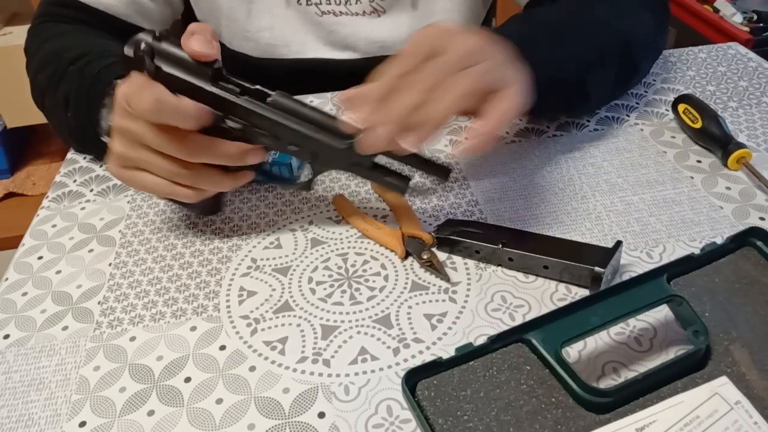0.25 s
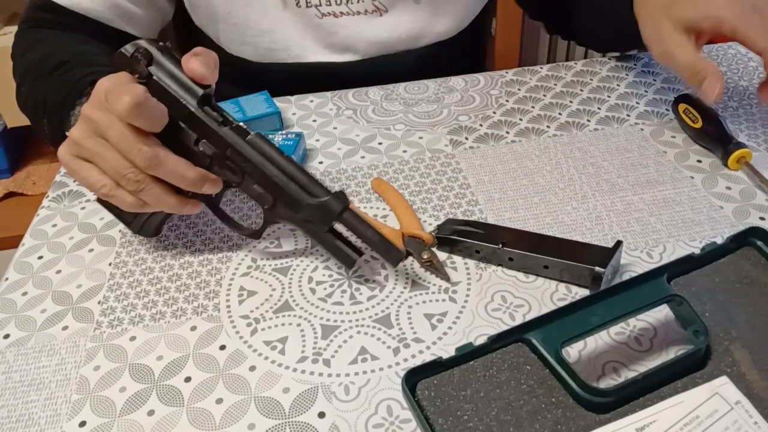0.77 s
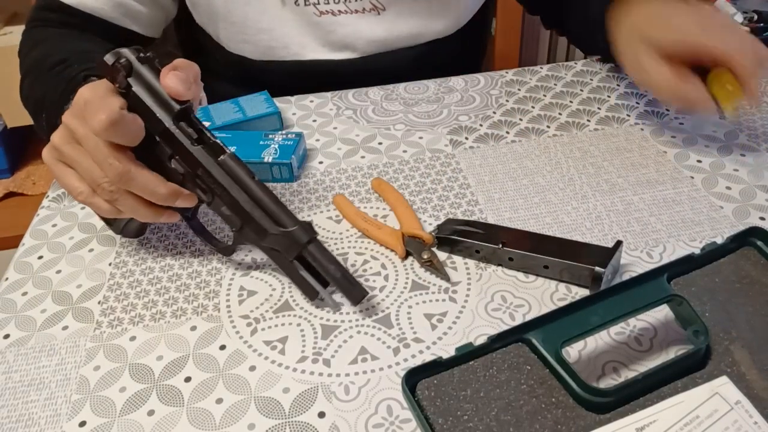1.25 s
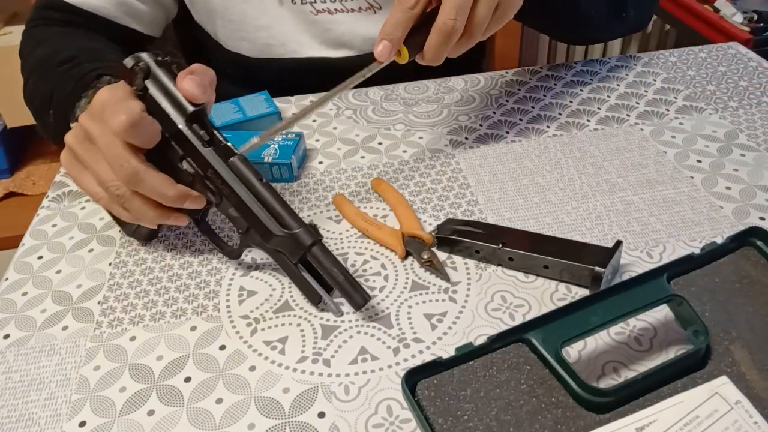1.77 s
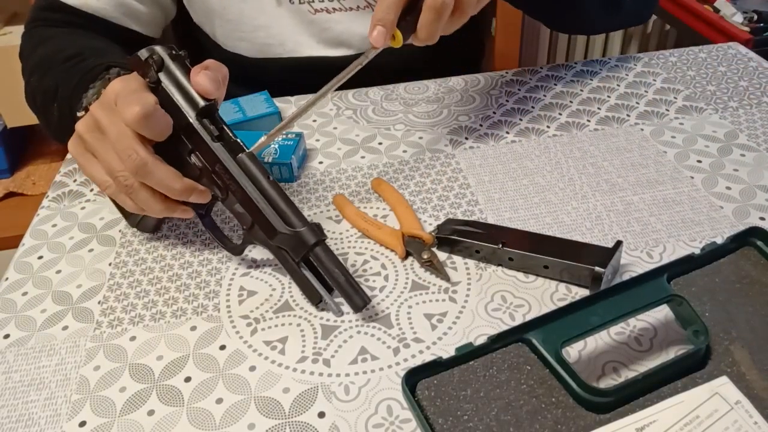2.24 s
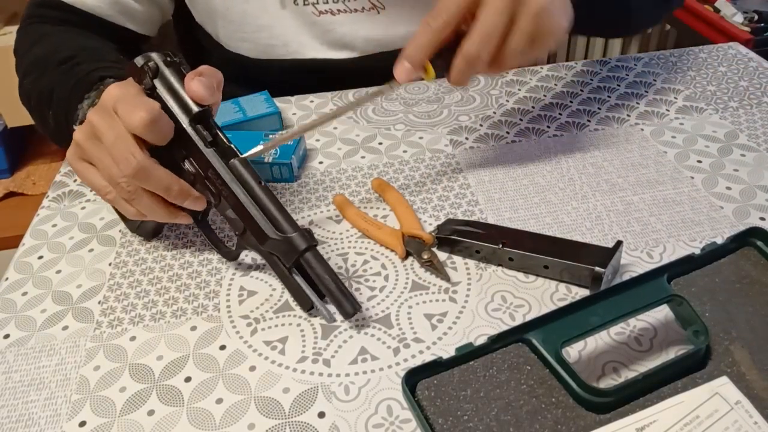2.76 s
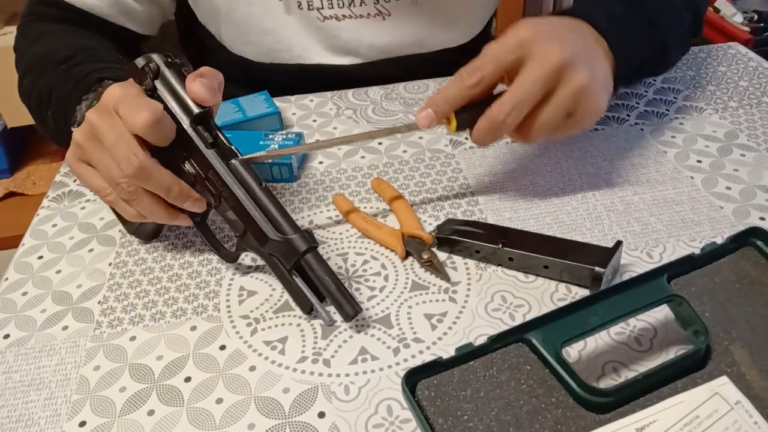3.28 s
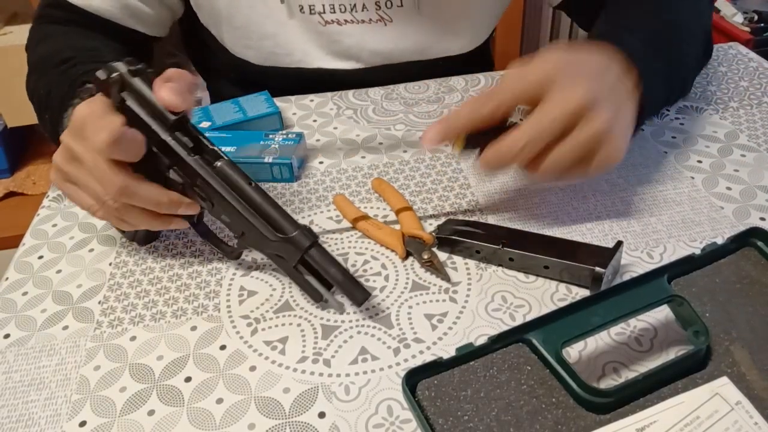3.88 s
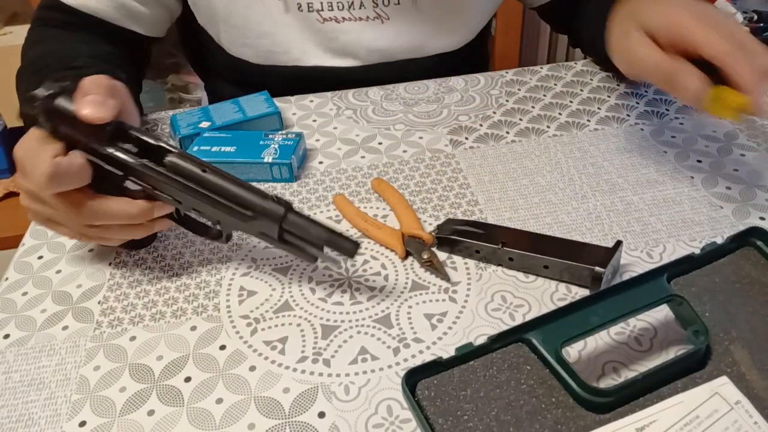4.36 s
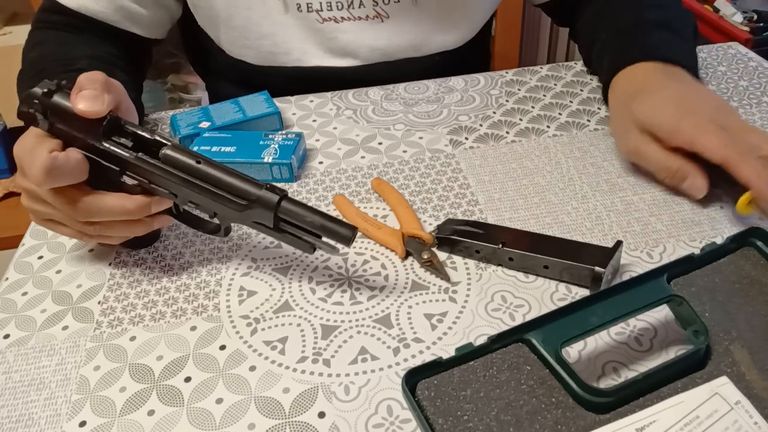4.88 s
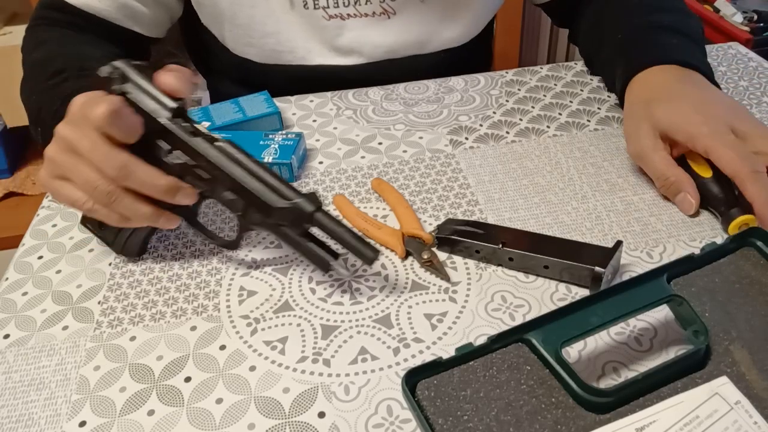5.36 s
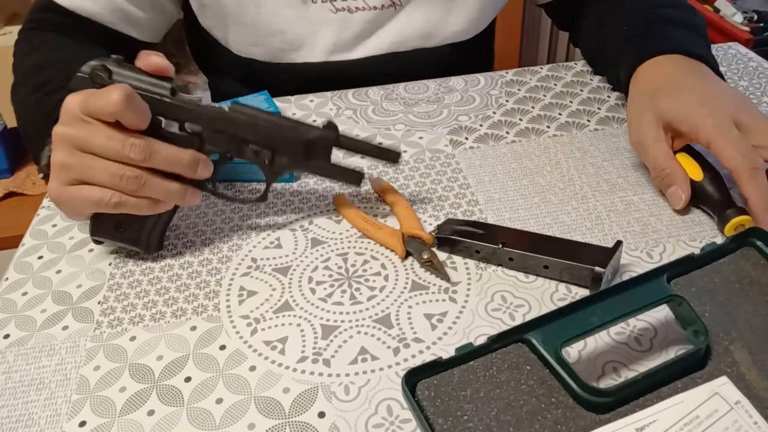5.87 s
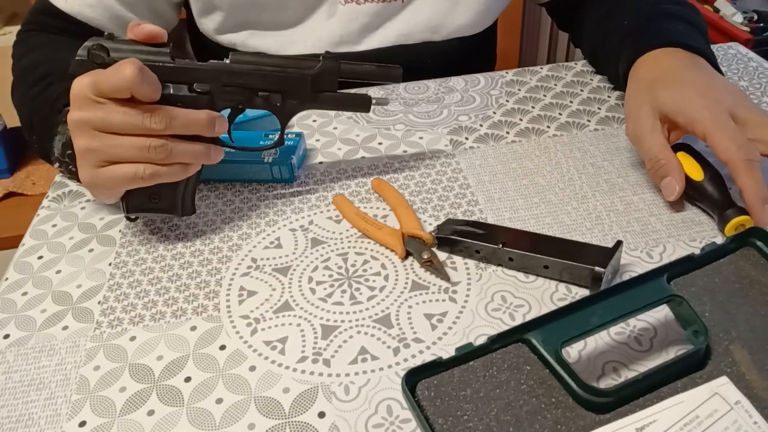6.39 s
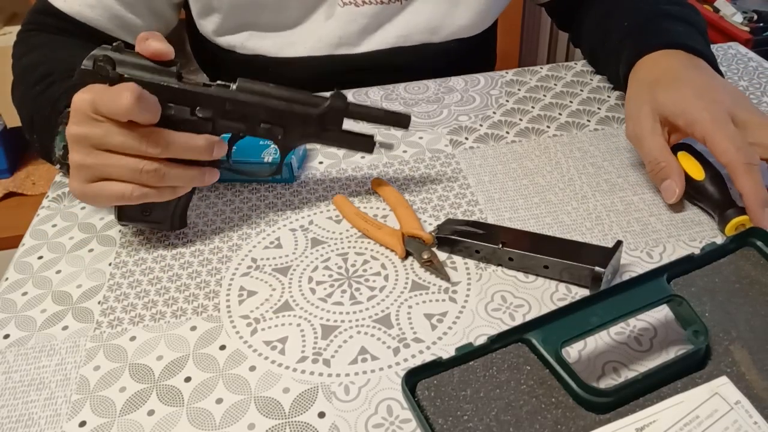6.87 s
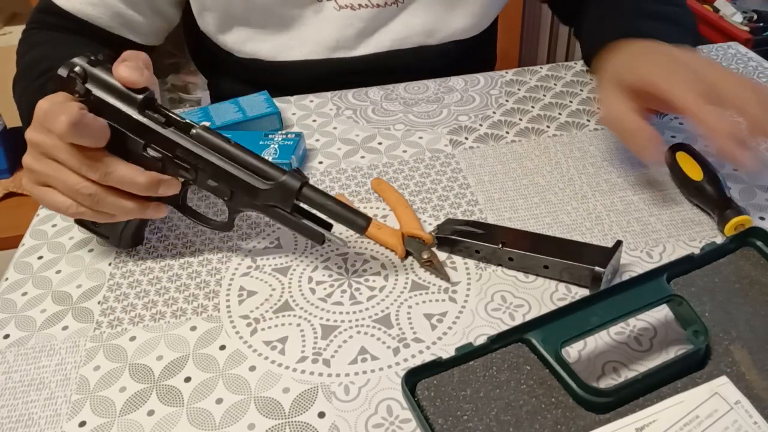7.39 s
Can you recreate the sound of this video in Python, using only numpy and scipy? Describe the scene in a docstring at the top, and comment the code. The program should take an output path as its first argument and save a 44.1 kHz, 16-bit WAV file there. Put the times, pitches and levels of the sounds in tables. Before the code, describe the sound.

A pistol is handled close to a stereo microphone pair in a small, bare room with a short echo. Quiet room tone, low finger rustle and a faint, wavering hum lie underneath. A light click opens, and at 1.2 seconds a soft table knock comes with a sleeve brushing cloth. Around 1.9 seconds a small steel lever clicks several times and a screwdriver blade taps brightly. A dull bump on the grip follows at 2.9, and a cluster of clicks and bumps near 4 seconds. At 5 seconds a catch snaps, and at once the slide strikes with a hard, briefly rattling metal clack, the loudest sound. The grip knocks firmly on the cloth-covered table at 5.3. Another sharp click comes at 6 seconds and two short, high squeaks at about 6.4. Faint metal ticks and soft handling bumps continue until about 7.6 seconds.

```python
"""A small, bare room, a spaced microphone pair close to a cloth-covered table where a pistol is worked.
A lever clicks, a screwdriver blade taps, a catch lets go, the slide clacks and the grip knocks on the
table: each blow is a brief chatter of contacts that rings one part, and the walls answer.
Fingers shift, sleeves brush the cloth and something squeaks twice near the end.
Behind it all lie the room tone and a faint, wavering drone."""
import sys
import numpy as np
from scipy import signal
from scipy.fft import rfft, irfft, next_fast_len
from scipy.io import wavfile
from scipy.ndimage import uniform_filter1d

SR = 44100
rng = np.random.default_rng(int(sys.argv[2]) if len(sys.argv) > 2 else 0)


def pcm_store(signal):
    """Save signal as 16-bit PCM."""
    levels = np.round(np.clip(np.atleast_2d(signal), -1, 1) * 32767)
    wavfile.write(sys.argv[1], SR, levels.astype(np.int16).T)


N = 336483

# Blows on metal and table. Each row: start in seconds, level in dB, brightness in dB per octave,
# chatter time in seconds, left over right in dB, room send in dB.
LEVER_CLICKS = [(0.0, -55.5, 12.5, 0.0022, 1, 3), (1.8711, -43.5, 7, 0.0012, 0.5, -6),
                (1.8924, -52.5, 7.5, 0.0017, 8, -1), (1.9043, -48.5, 2.5, 0.0023, -4, -8),
                (3.958, -48.5, 1, 0.0012, 0, -5.5), (6.0179, -42.5, 4, 0.00067, -2.5, -3.5)]
TABLE_KNOCKS = [(1.1925, -47, -3, 0.0067, 0.2, -1.5), (1.9105, -53.5, 4.5, 0.00088, 0.32, -2.5),
                (3.950, -51.5, 2.5, 0.0041, 0.61, -0.5), (5.2655, -24.5, 1.5, 0.0018, 1.9, -2),
                (6.265, -57.5, -2, 0.019, 1.5, -2), (6.44, -61, -9, 0.0044, 0.46, 1.5),
                (7.16, -62.5, 2.6, 0.03, 1, -1.5)]
BLADE_TAPS = [(1.963, -44, 1, 0.0013, 2.3, -4.5), (2.1782, -58, -2.7, 0.00082, 3, -7),
              (3.9824, -52, 0.87, 0.00059, 1.9, -10)]
CATCH_SNAPS = [(4.9935, -34.5, 0.97, 0.00065, 7, -5), (6.0182, -47.5, 0, 0.00057, 3, -8.5)]
SLIDE_CLACKS = [(5.1012, -18.5, 1, 0.0024, 3, -6.5), (5.1208, -30.5, 0.5, 0.0047, 0.78, -1),
                (5.1585, -31, -3.5, 0.0054, 1.1, -14), (5.181, -33.5, -4, 0.0034, 1, 0),
                (5.198, -41.5, -4.5, 0.0055, 0.85, -4)]
# Hand against grip. Each row: as above, without left over right.
GRIP_BUMPS = [(.95, -65, 2, 0.014, 1), (1.7, -68, 5, 0.017, 2), (1.87, -61, -6, 0.0047, -3),
              (1.971, -52.5, -7.5, 0.0026, -9.5), (2.892, -45.5, -4.5, 0.0057, -1.5),
              (3.339, -64, 0, 0.009, -5), (3.79, -65, 1, .012, 2.5), (3.961, -50, 0.5, 0.011, -6.5),
              (4.55, -55, -1.5, 0.0074, -8.5), (4.78, -66, 6.5, 0.013, 5), (5.79, -59, 7.5, 0.011, 0.5),
              (6.02, -57.5, 8.5, 0.0058, 3.5), (6.25, -61.5, 4, 0.012, -9), (7.56, -61.5, 2, 0.019, 2)]
# Tiny ticks of metal on metal. Each row: start in seconds, level in dB.
FINE_TICKS = [(2.6026, -81), (2.651, -73.5), (2.7203, -84), (2.973, -79), (3.8416, -63.5), (5.4553, -74)]

# What each part rings with, damped by the hand. Each row: frequency in Hz, width in Hz, level in dB.
LEVER_MODES = [(336, 71, 0), (720, 510, 4), (1980, 1300, -2.5), (2700, 580, -2.5), (3290, 510, -9),
               (3970, 910, -9), (4970, 1300, -17.5), (6220, 3150, -23)]
GRIP_MODES = [(82, 130, -10.5), (167, 140, 0.5), (234, 32, -11.5), (330, 110, -8), (560, 250, -22)]
TABLE_MODES = [(135, 330, -10), (259, 76, -6), (436.7, 26, 0), (492, 320, -1), (853, 190, -3),
               (1205, 410, -9.5), (1486, 130, -16), (2206, 640, -28), (6200, 1100, -61.5)]
BLADE_MODES = [(1950, 320, -1), (2630, 950, -3.5), (3690, 560, -3), (4590, 330, 1), (5350, 840, -7.5),
               (6470, 460, 1.5), (8300, 980, -15), (11100, 1300, -22.5), (14500, 1700, -23)]
TICK_MODES = [(3570, 580, -20.5), (6200, 420, -4), (6800, 1100, 2), (8300, 1300, -10.5)]
CATCH_MODES = [(198, 200, -1.5), (540, 160, -4.5), (945, 260, 1), (1490, 150, 0.5), (1980, 570, -7),
               (3100, 900, -15.5), (5283, 1500, -34), (6400, 650, -33)]
SLIDE_MODES = [(173, 110, -13), (290, 180, -10.5), (785, 200, -5), (1003, 390, -7.5), (1717, 290, -1),
               (1844, 16, 5), (2030, 250, -5.5), (1985, 31, -1), (2470, 130, -4), (2725, 500, -7.5),
               (3530, 680, -16.5), (4540, 450, -28.5), (5527, 550, -25), (6470, 1700, -29)]

# Sleeves and screwdriver sliding on the tablecloth.
# Each row: start in seconds, length in seconds, level in dB, brightness in dB per octave.
CLOTH_STROKES = [(0.389, 0.5, -78, 4.5), (1.175, 0.2, -63.5, 0.5), (1.28, 0.42, -72.5, -5),
                 (3.551, 0.13, -73.5, -0.5), (4.059, 0.28, -80.5, -2.5), (4.228, 0.34, -78, 5),
                 (5.298, 0.51, -81.5, 2.5), (7.46, 0.39, -77.5, 0.5)]
# Pitched sounds: a low hum, a thin whine above it, two squeaks.
# Each row: start in seconds, length in seconds, pitch in Hz, relative level in dB.
HUM_SWELLS = [(.45, 0.26, 108, -73.5), (1.95, 0.51, 132, -70.5), (2.5, 1.6, 89, -69.5),
              (6.48, 0.71, 133.6, -64.5), (7.14, 0.19, 112, -64.5), (7.44, 0.27, 140, -64)]
WHINE_SWELLS = [(6.5, .18, 596, -75), (6.8, 0.29, 630, -75)]
SQUEAKS = [(6.383, 0.062, 3160, -59), (6.444, .042, 2900, -49.5)]
# The harmonics of a squeak. Each row: multiple of the pitch, relative level in dB.
SQUEAK_HARMONICS = [(1, 5), (2, -7.5), (3, -16)]

# Colour of the noises and of the microphones. Each row: frequency in Hz, relative level in dB.
ROOM_TONE_SPECTRUM = [(15, -45), (25, -22.5), (92, -4), (159, -8.5), (228, -10.5), (343, -14.5),
                      (378, -13.5), (555, -17), (672, -14), (796, -20), (1980, -20), (3450, -31.5),
                      (5710, -47.5), (6750, -38.5), (7800, -47), (10100, -86), (17200, -120)]
SKIN_SPECTRUM = [(30, -18), (90, 2), (200, 0.5), (380, -4.5), (750, -6.5), (1500, -21), (6000, -62)]
CLOTH_SPECTRUM = [(200, -7.5), (700, -0.5), (2200, 9), (3500, -2.5), (5000, -4.5), (6800, -1), (9000, -13),
                  (15000, -25)]
MIC_RESPONSE = [(20, -2.5), (7200, 1.5), (7900, -10.5), (9500, -14), (15000, -19)]
# How alike the two microphones hear. Each row: frequency in Hz, left-right correlation.
MIC_CORRELATION = [(50, 0.93), (130, 0.81), (300, 0.83), (500, 0.32), (850, 0.095), (1500, -.2),
                   (4000, -0.069), (9000, 0.44)]
# First echoes off the walls. Each row: delay in seconds, level in dB.
WALL_ECHOES = [(.011, -17.5), (0.0229, -15)]
# The room's decay. Each row: frequency in Hz, time to fall 60 dB in seconds.
ROOM_T60 = [(150, 0.51), (400, 0.28), (1000, 0.39), (2700, 0.36), (7000, 0.3), (14000, .25)]


def amp(db):
    """Decibels to gain."""
    return 10 ** (np.asarray(db) / 20)


def unit(x):
    """Scales to rms 1."""
    return x / np.sqrt(np.mean(x ** 2) + 1e-30)


def pan(db):
    """Stereo gains that put the left microphone db above the right."""
    return amp([[db / 2], [-db / 2]])


def curve(points, hz):
    """Joins (Hz, value) points on a log-frequency axis."""
    point_hz, value = np.transpose(points)
    return np.interp(np.log(hz + 1), np.log(point_hz + 1), value)


def add(mix, start, sound):
    """Mixes a sound in at start seconds."""
    part = mix[:, max(round(start * SR), 0):][:, :sound.shape[1]]
    part += sound[:, :part.shape[1]]


def colour(x, points):
    """Filters by a (Hz, dB) spectrum."""
    hz = np.fft.rfftfreq(x.shape[-1], 1 / SR)
    return irfft(rfft(x) * amp(curve(points, hz)), x.shape[-1])


def swell(length, rise_s, fall_s):
    """Attack, hold and release."""
    t = np.arange(0, length, 1 / SR)
    return np.clip(np.minimum(t / rise_s, (length - t) / fall_s), 0, 1)


def wobble(size, span):
    """Random unevenness of rms 1, smoothed over span samples."""
    return unit(uniform_filter1d(rng.standard_normal(size), size=span))


def noise_pair(size):
    """White noise at two spaced microphones: alike in the bass, much less so higher up."""
    left, other = rfft(rng.standard_normal((2, size)))
    alike = np.clip(curve(MIC_CORRELATION, np.fft.rfftfreq(size, 1 / SR)), -.99, .99)
    right = alike * left + np.sqrt(1 - alike ** 2) * other
    return irfft(np.array([left, right]), size)


def causal(gain):
    """Gives a magnitude the phase of a real resonator, which rings only after the blow."""
    log_gain = np.log(gain + 1e-7)
    mirrored = np.concatenate([log_gain, log_gain[..., -2:0:-1]], -1)
    return np.exp(np.conj(signal.hilbert(mirrored)))[..., :gain.shape[-1]]


def room(x, gap_s=0.0046, build_s=0.0014):
    """Two wall echoes in a diffuse tail that swells after a short gap; each band dies at its own speed."""
    hz, t, bands = signal.stft(noise_pair(SR * 3 // 4), SR, nperseg=256)
    decay = amp(-60 * t / curve(ROOM_T60, hz)[:, None])
    tail = signal.istft(bands * decay, SR, nperseg=256)[1]
    since_gap = np.maximum(np.arange(tail.shape[1]) / SR - gap_s, 0)
    tail *= 1 - np.exp(-since_gap / build_s)
    tail /= np.linalg.norm(tail[0])
    for delay, db in WALL_ECHOES:
        tail[:, round(delay * SR)] += amp(db)
    return signal.fftconvolve(np.atleast_2d(x), tail, axes=1)


def blows(rows, modes, crack_db, size=8192):
    """Each blow is a brief chatter of contacts that rings the modes of one part, and then the room."""
    out, t, hz = np.zeros((2, N)), np.arange(size) / SR, np.fft.rfftfreq(size, 1 / SR)
    peaks = [amp(db) / (1 + ((hz - centre) / (width / 2)) ** 2) for centre, width, db in modes]
    body = np.linalg.norm(peaks, axis=0)
    body *= hz ** 2 / (hz ** 2 + 70 ** 2)  # small parts radiate little bass
    hardest_db = max(row[1] for row in rows)
    for start, db, tilt_db, chatter_s, pan_db, room_db in rows:
        ring = unit(body * amp(tilt_db * np.log2((hz + 100) / 1000)))
        force = amp(db) * np.sqrt(SR / 100)  # the energy of 10 ms at this level
        age = t / chatter_s
        contact = rfft(noise_pair(size) * np.sqrt(age) * np.exp(-age))
        contour = np.sqrt(uniform_filter1d(abs(contact) ** 2, size=31, axis=1))
        contact *= force / causal(contour)  # all modes get an equal push
        crack = amp(crack_db + db - hardest_db)  # the contact itself cracks, more so in a hard blow
        direct = irfft(contact * causal(np.hypot(ring, crack)))
        reverb = room(irfft(contact[0] * causal(ring)))
        add(out, start, direct * pan(pan_db))
        add(out, start, amp(room_db) * reverb * pan(1))
    return out


def room_tone(db=-70.5):
    """The room's own steady noise."""
    return amp(db) * unit(colour(noise_pair(N), ROOM_TONE_SPECTRUM))


def lever_clicks():
    """A small steel lever clicks, ringing in broad, damped modes."""
    return blows(LEVER_CLICKS, LEVER_MODES, crack_db=-23)


def fingers(db=-70.5, lumps_db=4.0, start_s=0.14, rise_s=0.27):
    """Low, lumpy rustle of fingers that start shifting on the grip and keep on."""
    lumps = unit(uniform_filter1d(wobble(N, 2000), size=500))
    fade_in = np.clip((np.arange(N) / SR - start_s) / rise_s, 0, 1)
    rustle = colour(noise_pair(N), SKIN_SPECTRUM) * amp(lumps_db * np.tanh(lumps))
    return amp(db) * fade_in * unit(rustle)


def sleeves(rest_db=-88, grain_db=1):
    """Cloth sliding on cloth: each stroke is a soft hiss, uneven as the fibres catch."""
    out = amp(rest_db) * unit(colour(noise_pair(N), CLOTH_SPECTRUM))
    for start, length, db, tilt_db in CLOTH_STROKES:
        speed = swell(length, rise_s=0.054, fall_s=0.17)
        spectrum = [(hz, level + tilt_db * np.log2(hz)) for hz, level in CLOTH_SPECTRUM]
        hiss = unit(colour(noise_pair(2 * SR), spectrum))
        add(out, start, amp(db) * speed * hiss[:, :len(speed)])
    return out * amp(grain_db * wobble(N, 200))


def drone(swells, width_hz):
    """A narrow, wavering tone comes and goes in the background, each swell on its own pitch."""
    out, size = np.zeros((1, N)), next_fast_len(N)
    band = np.exp(-(np.fft.fftfreq(size, 1 / SR) / width_hz) ** 2)
    waver = np.fft.ifft((rng.standard_normal(size) + 1j * rng.standard_normal(size)) * band)
    waver /= np.sqrt(abs(waver))  # softens the swings in level
    for start, length, hz, db in swells:
        envelope = swell(length, rise_s=0.066, fall_s=0.13)
        samples = round(start * SR) + np.arange(len(envelope))
        tone = (waver[samples % size] * np.exp(2j * np.pi * hz * samples / SR)).real
        add(out, start, amp(db) * envelope[None] * unit(tone))
    return out


def grip_bumps(pan_db=2):
    """The hand bumps the grip, which rings low and soft, a little to the left."""
    rows = [(*bump, pan_db, room_db) for *bump, room_db in GRIP_BUMPS]
    return blows(rows, GRIP_MODES, crack_db=-39)


def table_knocks():
    """The grip knocks on the table, dull through the cloth."""
    return blows(TABLE_KNOCKS, TABLE_MODES, crack_db=-51)


def blade_taps():
    """The screwdriver blade meets the pistol with a sharp crack and a bright ring."""
    return blows(BLADE_TAPS, BLADE_MODES, crack_db=-8)


def metal_ticks(turn_start_s=5.5, turn_end_s=7.3, count=10, loose_db=-78.5, spread_db=4.5):
    """Metal ticks on metal here and there, and loose parts tick faintly while the pistol is turned."""
    gap = (turn_end_s - turn_start_s) / count
    loose = [(turn_start_s + (k + late) * gap, loose_db + spread_db * (2 * force - 1))
             for k, (late, force) in enumerate(rng.random((count, 2)))]
    tilt_db, chatter_s, pan_db, room_db = 0, 0.0011, 0.7, -12
    rows = [(start, db, tilt_db, chatter_s, pan_db, room_db) for start, db in FINE_TICKS + loose]
    return blows(rows, TICK_MODES, crack_db=-10)


def catch_snaps():
    """The catch lets go: a very short contact rings it in the midrange."""
    return blows(CATCH_SNAPS, CATCH_MODES, crack_db=-37)


def slide_clacks():
    """The steel slide strikes once, hard, and four lighter clacks follow at once."""
    return blows(SLIDE_CLACKS, SLIDE_MODES, crack_db=-34.5)


def squeaks(scoop=0.037, scoop_s=0.0045, sag_per_s=0.15, jitter=0.022, fade_db_per_s=373, edge_s=0.0019):
    """Two short, nearly pure squeaks: each scoops up to its pitch, then sags and fades."""
    out = np.zeros((2, N))
    for start, length, hz, db in SQUEAKS:
        t = np.arange(0, length, 1 / SR)
        pitch = hz * (1 - scoop * np.exp(-t / scoop_s) - sag_per_s * t)
        pitch *= 1 + jitter * wobble(len(t), 90)
        phase = 2 * np.pi * np.cumsum(pitch) / SR
        tone = unit(sum(amp(part_db) * np.sin(k * phase) for k, part_db in SQUEAK_HARMONICS))
        flutter_db = wobble(len(t), 250)  # the rubbing is uneven
        tone *= amp(db - fade_db_per_s * t + flutter_db) * swell(length, edge_s, edge_s)
        add(out, start, tone * pan(3))
        add(out, start, room(tone))
    return amp(-2) * out


def scene():
    """Pistol, table and sleeves up close, over a quiet bed that leans slightly left."""
    steel = lever_clicks() + blade_taps() + catch_snaps() + slide_clacks()
    knocks = table_knocks() + grip_bumps()
    bed = room_tone() + fingers() + drone(HUM_SWELLS, width_hz=17.8) + drone(WHINE_SWELLS, width_hz=15)
    return steel + knocks + metal_ticks() + sleeves() + squeaks() + bed * pan(2.2)


def record(dry, hiss_db=-101, cutoff_hz=15800):
    """The microphone pair: a dull top octave, a trace of hiss and a band limit."""
    heard = colour(dry, MIC_RESPONSE) + amp(hiss_db) * rng.standard_normal((2, N))
    lowpass = signal.firwin(255, cutoff_hz, window=("kaiser", 8), fs=SR)
    return signal.oaconvolve(heard, lowpass[None], "same")


dry = scene()
out = record(dry)
pcm_store(out)
```